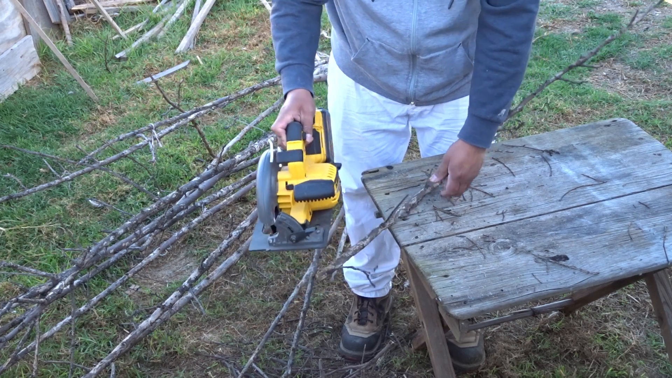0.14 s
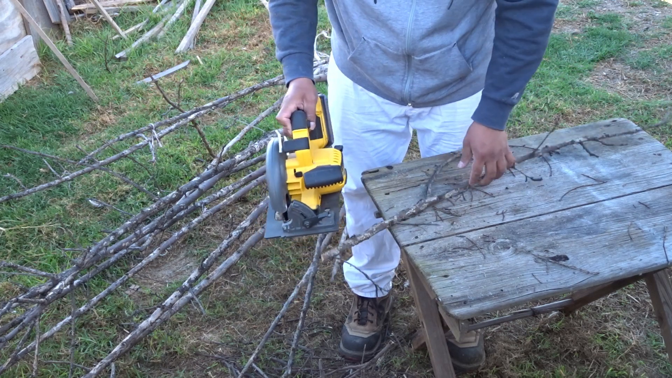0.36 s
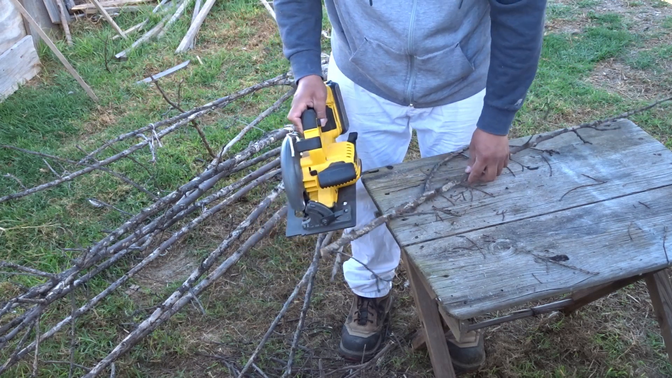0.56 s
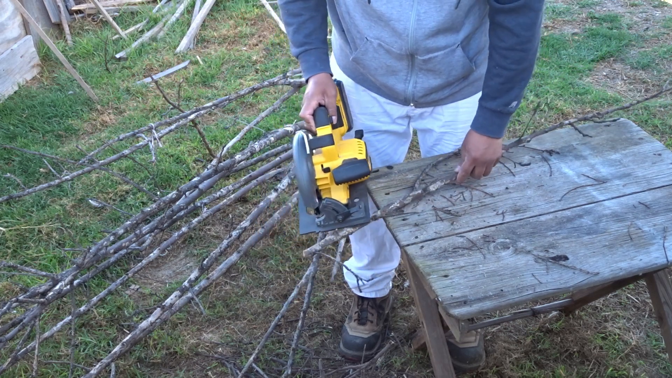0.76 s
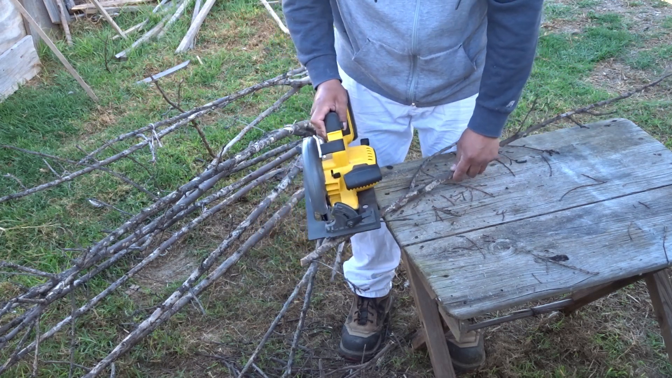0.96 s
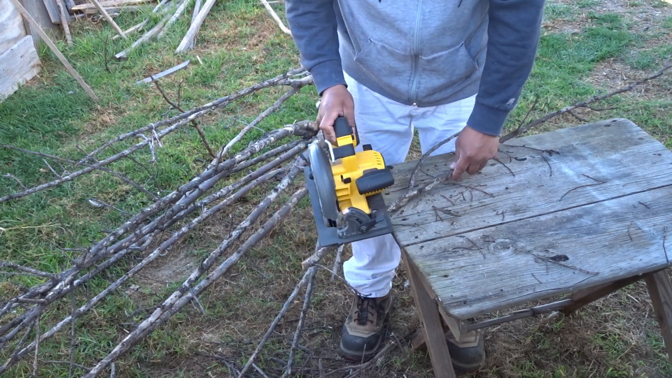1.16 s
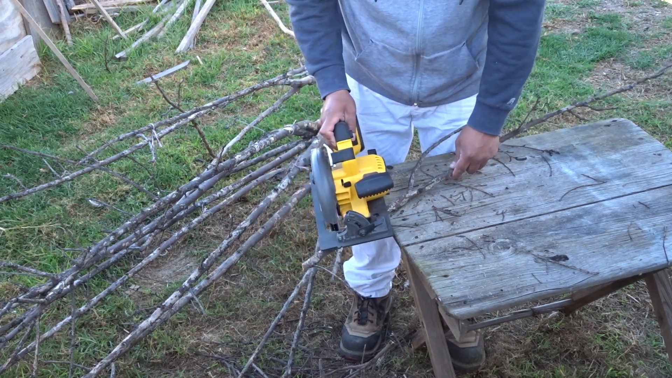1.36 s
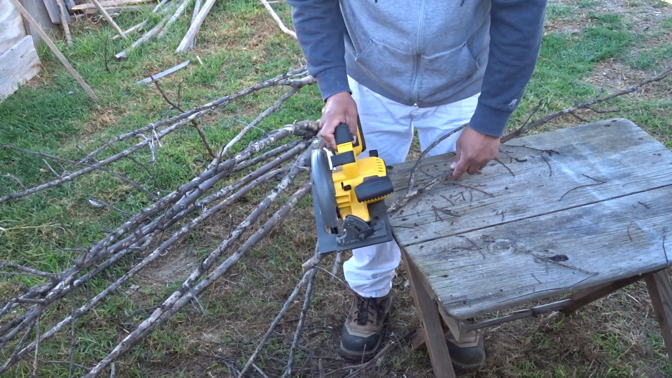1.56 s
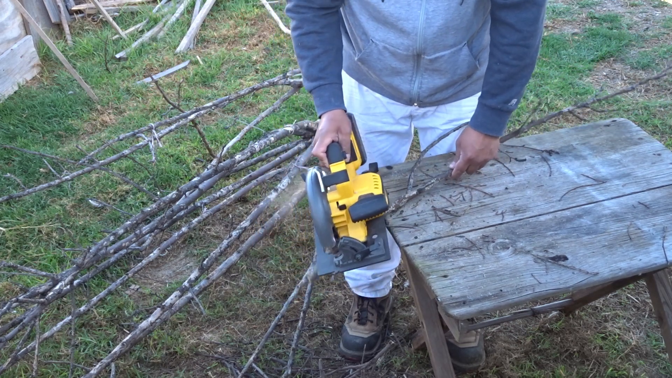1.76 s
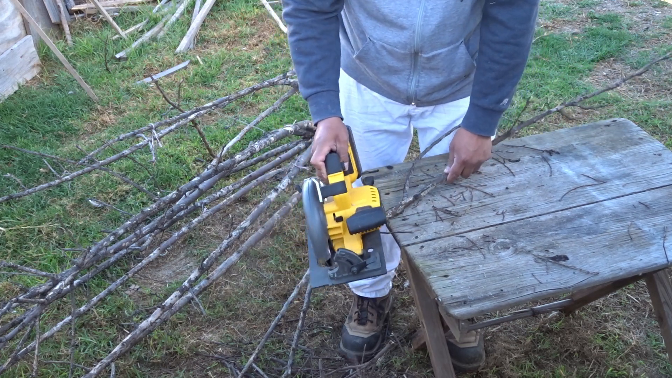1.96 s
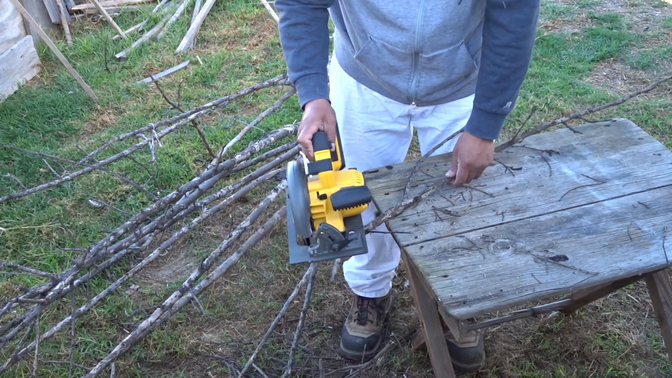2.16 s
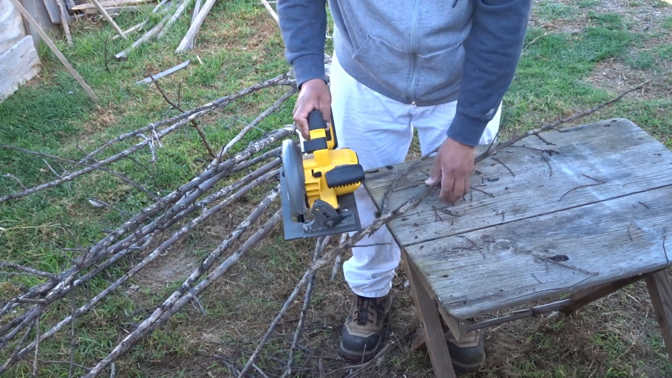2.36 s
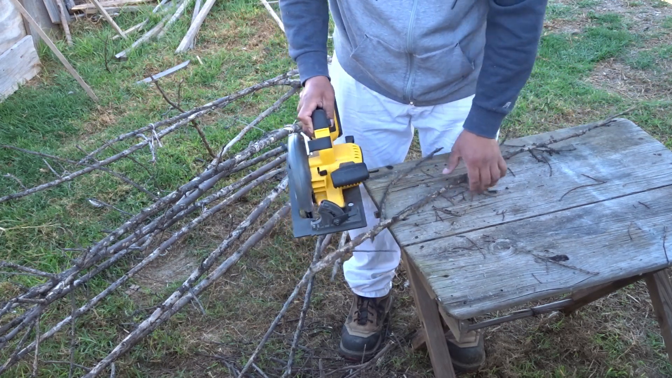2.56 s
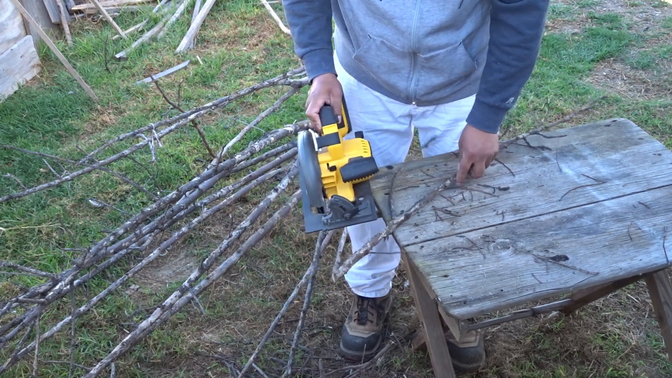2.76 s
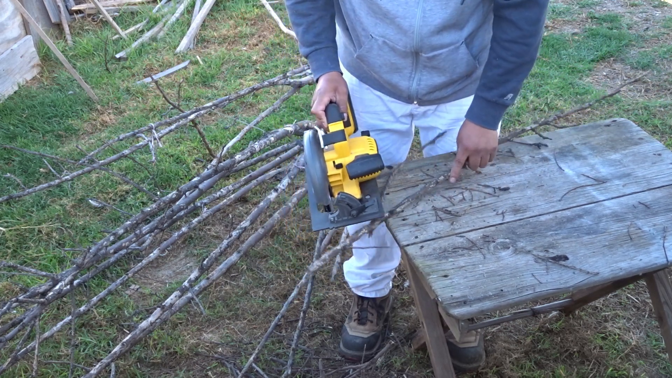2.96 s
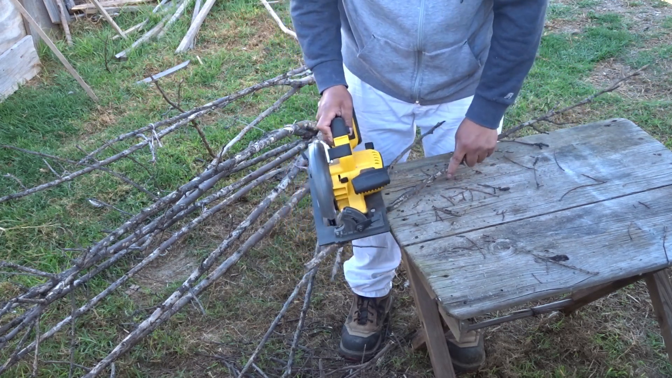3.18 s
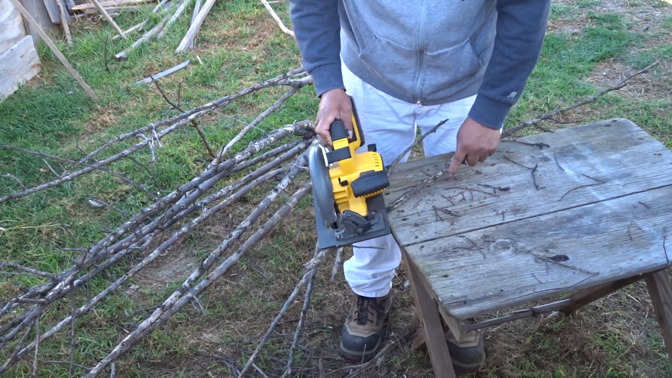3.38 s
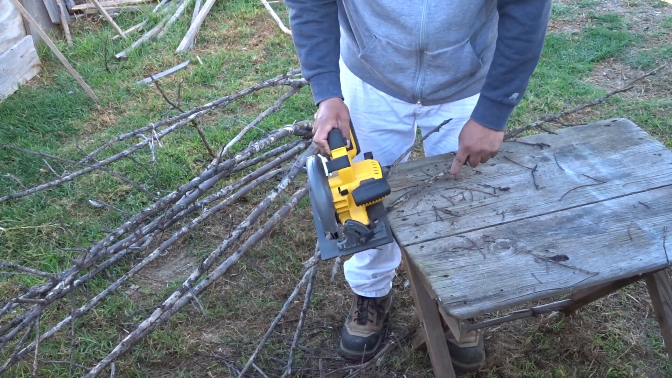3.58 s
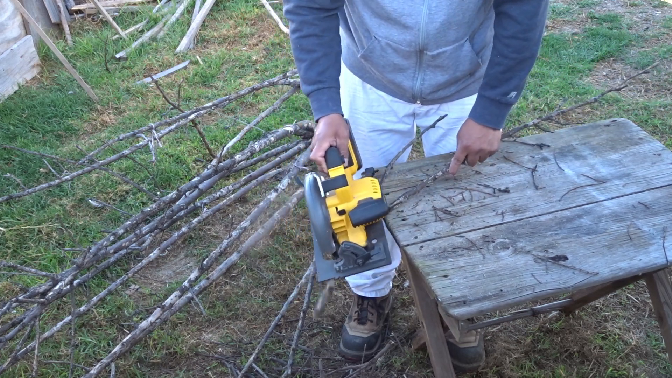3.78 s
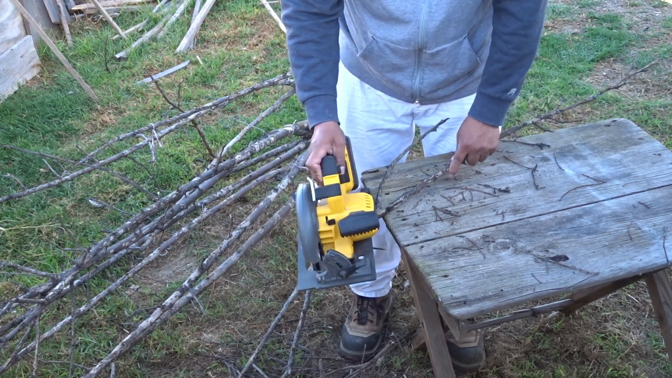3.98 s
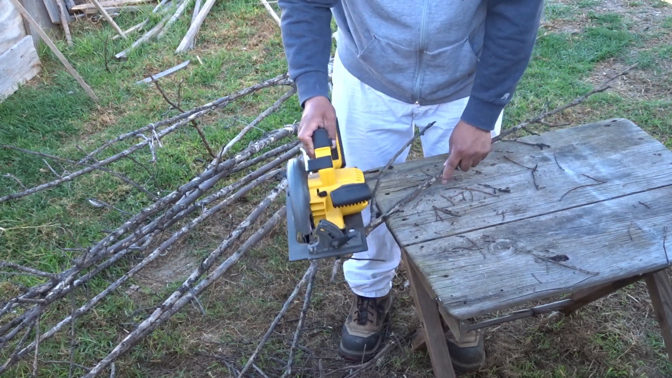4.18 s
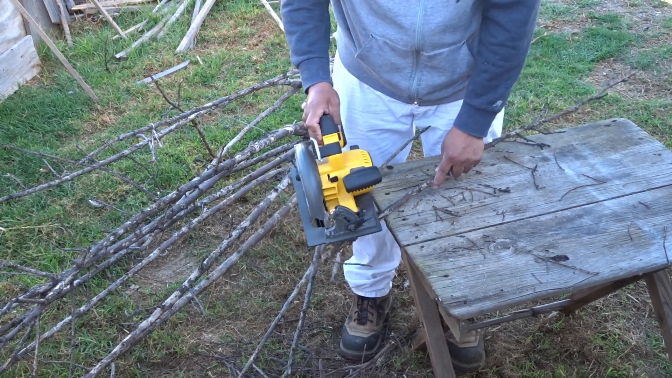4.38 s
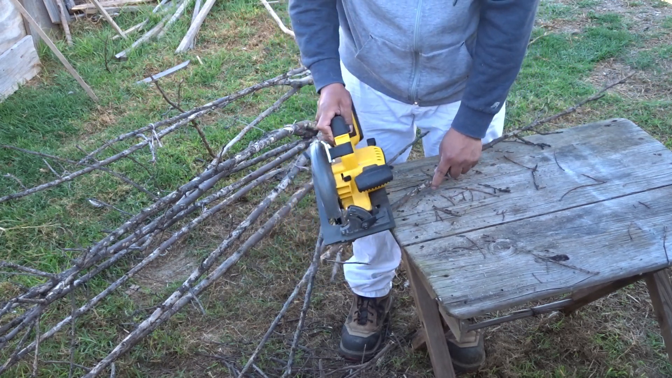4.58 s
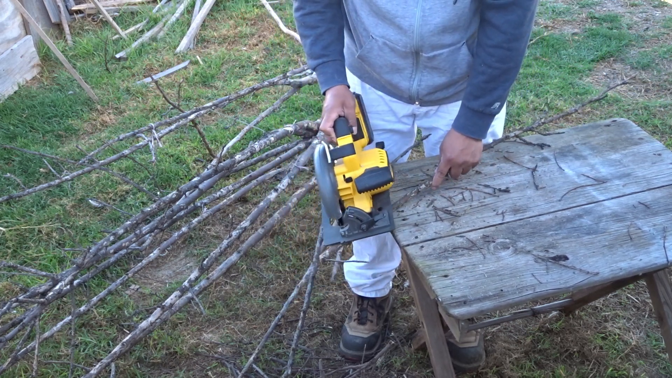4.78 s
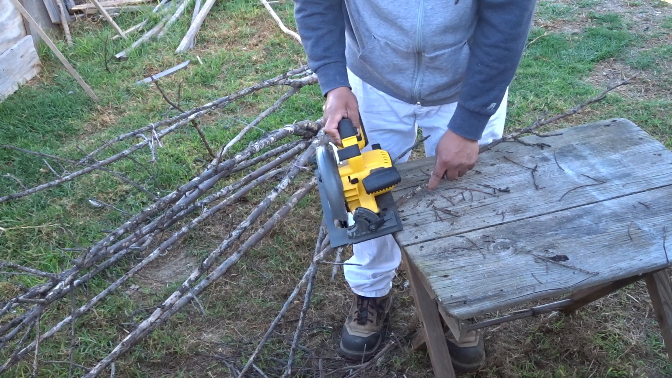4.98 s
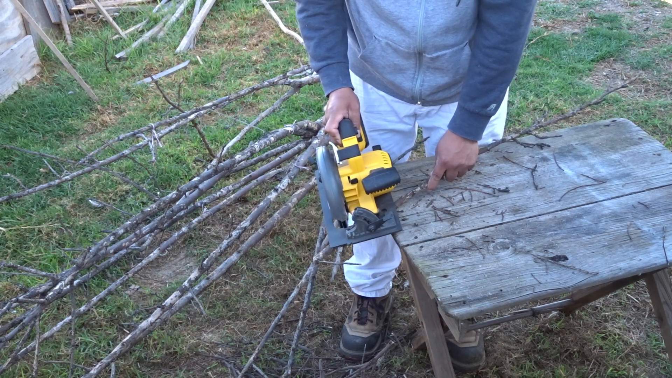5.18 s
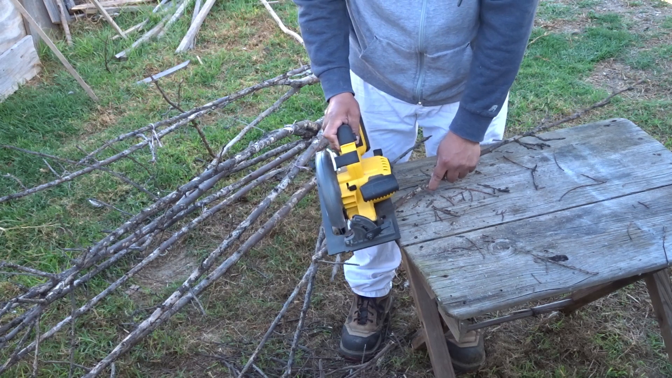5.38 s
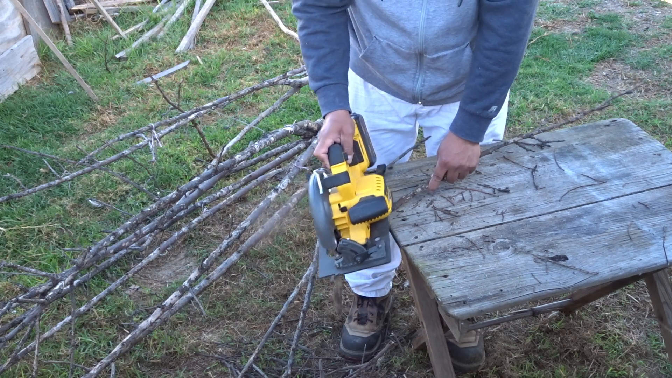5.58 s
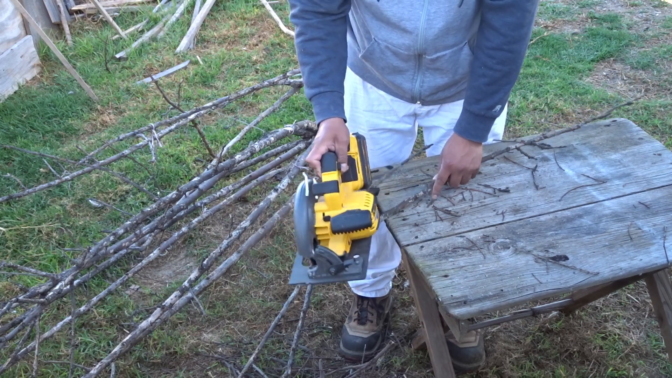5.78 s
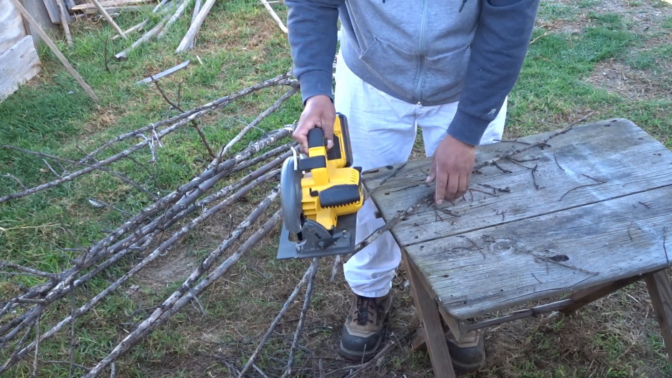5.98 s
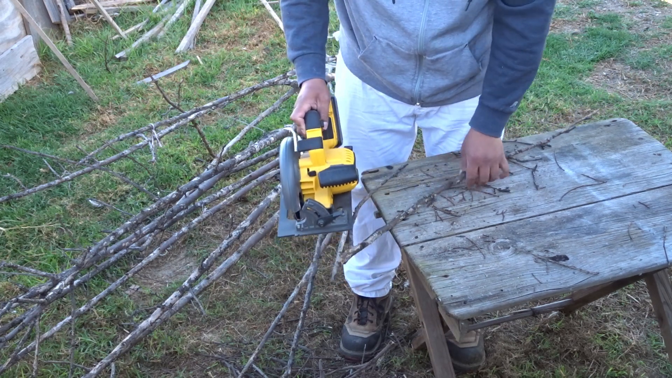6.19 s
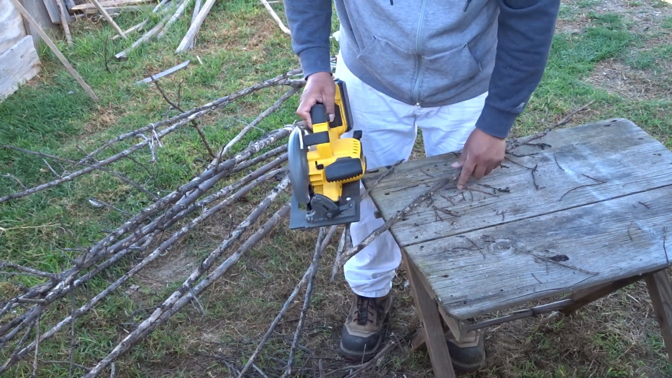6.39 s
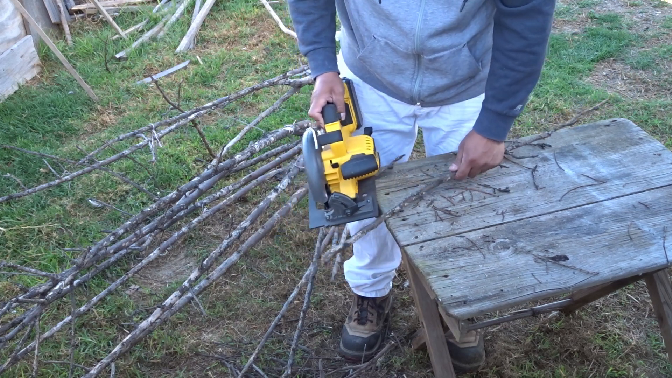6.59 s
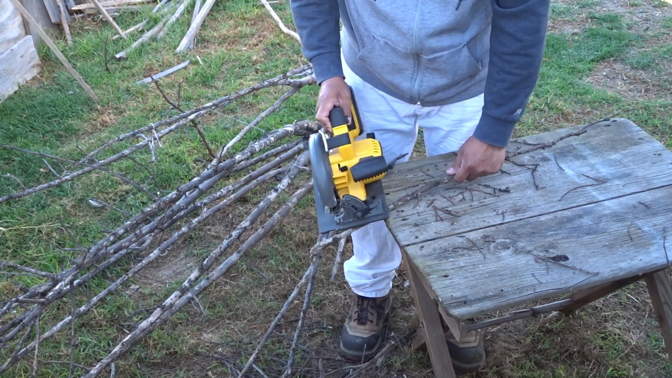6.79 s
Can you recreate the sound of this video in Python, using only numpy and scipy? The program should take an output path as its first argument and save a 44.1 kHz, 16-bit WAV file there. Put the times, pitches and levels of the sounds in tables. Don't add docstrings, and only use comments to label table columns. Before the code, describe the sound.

Four short bursts of a battery circular saw, three biting dry sticks, each stopping fast with a metallic ring, amid crackling twigs and faint birds.

```python
import sys
import numpy as np
from scipy import signal
from scipy.fft import rfft, irfft, next_fast_len
from scipy.io import wavfile
from scipy.ndimage import uniform_filter1d

SR = 44100
rng = np.random.default_rng(int(sys.argv[2]) if len(sys.argv) > 2 else 0)


def put_to_file(sound):
    columns = np.atleast_2d(sound).T
    safe = np.clip(columns, -1, 1)
    whole_steps = np.round(safe * 32767)
    wavfile.write(sys.argv[1], SR, whole_steps.astype(np.int16))


def invert_db(level):
    return 10 ** (np.asarray(level, dtype=float) / 20)


N = 301644
T = np.arange(N) / SR

# (by the brake law, 1 s before halt)
PULLS = [
    (-1, 1100, 445, .452, 562),
    (1.4358, 1045, 440, 2.513, 585),
    (3.367, 1115, 445, 4.543, 590),
    (5.146, 1100, 450, 6.33, 595),
]
FACING_DB = [
    -1.4,
    0.12,
    0.091,
    .1,
]
# multiple_of_shaft, level_db, extra_braking_db, roughness_0_to_1, best_hz, spread_octaves
WHINE_ORDERS = [(1.016, -43.5, 9, 0.25, 424, 0.27), (3.946, -21.5, 8, 0.12, 1940, 0.81),
                (4.96, -33.5, -2, 0.8, 1860, 0.95), (7.967, -7, -2, 0.17, 2110, 0.42),
                (9.01, -13.5, 0, 0.42, 2050, 0.59), (12.02, -29, 9.5, 0.97, 3000, 0.78),
                (13.08, -12.5, 0.8, 0.14, 4130, 0.72), (16.04, -17.5, 3.5, 0.31, 3100, 0.68),
                (17.76, -18, -5.5, 0.9, 2670, 0.57), (19.6, -26, -1, 0.1, 1700, 0.29),
                (25.96, -24.5, 0, 1, 4700, 0.74), (27.5, -29.5, 7, 0.5, 5900, 0.44)]
# shaft_hz, rattle_db, whine_over_rattle_db, climbing_air_over_rattle_db, braking_air_db
LOUDNESS_BY_SPEED = [(45.3, -28, 4, -41, -23.5), (90, -23.5, 1, -38, -18.5), (140, -21, -1, -25.5, -20),
                     (190, -22.5, -2.5, -10.5, -14), (287, -20, -2, -14, -18), (340, -19, -3, -7.5, -10.5),
                     (401, -16.5, -1, -6.5, -11.5), (432, -16, -2.5, -10, -10)]
# freq_hz, level_db
RATTLE_COLOUR = [(15, -62), (25, -52), (273, -65), (385, -56.5), (457, -40), (571, -20.5), (730, -24),
                 (826, -15), (1350, -13.5), (1530, -5.5), (1910, -6.5), (2320, -1), (2760, -5), (4090, -1),
                 (9000, -20.5), (11700, -28), (19800, -120)]
# pitch_hz, t60_s, level_db
GUARD_MODES = [(2214, 0.098, -22), (4038, 0.062, -16), (7356, 0.09, -19.5), (8120, 0.053, -28.5)]
# pitch_hz, width_hz, lift_db
HOUSING_BOOMS = [(2288, 405, 7.5), (4106, 600, 3.5), (7040, 1200, 2)]
# freq_hz, level_db
FAN_COLOUR = [(3530, -36), (6000, 2.5), (8510, 1), (9280, -5.5), (10800, -9), (12800, -23.5),
              (15600, -18.5), (16800, -43)]
MESH_HZ = 50
SETTLE_S, BRAKE_POWER = .12, .68
BRAKE_RATTLE_DB, CUT_WHINE_DB = -0.43, -7
STALL_HZ, STALL_DB = 136, -10

# freq_hz, level_db
YARD_COLOUR = [(25, -29.5), (120, -17.5), (300, -30), (600, -2), (1000, -8), (2000, 2), (4000, 3.5),
               (6000, -9.5), (10000, -33), (16500, -36)]
YARD_DB = -61.5
# middle_s, half_length_s, level_db
ENGINE_SWELLS = [
    (.6, 0.18, -85),
    (2.7, .3, -72.5),
    (6.8, .5, -90),
]

# start_s, fade_60db_s, crackles_per_s, level_db
DRAGS = [(.4, .5, 140, -43.5), (.7, 4.5, 350, -62), (1.24, 2, 270, -56), (2.45, 1.4, 130, -49),
         (2.7, 0.27, 1630, -45.5), (2.97, 1.6, 360, -53.5), (4.5, 0.55, 130, -47.5),
         (4.6, 0.28, 860, -50.5), (6.3, 1, 180, -56.5), (6.62, 1, 480, -53.5), (6.76, 1.5, 440, -62)]
DRAG_RISE_S = .3
TWIGS_DB, TWIGS_PER_S = -76.5, 230

# middle_s, half_length_s, level_db
BIRD_BOUTS = [
    (.9, .15, -57.5),
    (1.4, 0.22, -52.5),
    (2.7, 0.13, -55),
    (3.15, 0.13, -52),
    (4.78, 0.092, -51),
    (6.45, .35, -55),
]
BIRDS_REST_DB = -68
# time_s, pitch_hz, level_db
NEAR_CALL = [
    (1.41, 4900, -61),
    (1.425, 5800, -50),
    (1.45, 6300, -54),
    (1.475, 5900, -46),
    (1.49, 4900, -66),
]

# start_s, crack_peak_db, knock_over_crack_db, left_minus_right_db
SNAPS_AND_CATCHES = [(0.412, -34, 3, 6), (0.4313, -32.5, -10, -15), (0.447, -32, -3, 0.0), (0.7351, -56, 8, 6),
                     (0.822, -57, 9, 0.5), (1.2395, -57, 22.5, -6), (1.49, -43, 15, -0.5), (1.508, -50, 14, 9),
                     (1.5333, -58, 36, 8), (2.602, -18.5, -9.5, -4), (2.6817, -28, -20, 2),
                     (2.7566, -33, -12, -2.0), (2.8907, -15, -24, -6), (2.965, -36, -5, -9), (2.9744, -39, -1, 3),
                     (2.9889, -36, -5, -8), (3.2523, -49.5, 11, 0), (3.414, -47, 18, -2), (3.4467, -41, 8.5, 6),
                     (4.562, -11, -8, -3.0), (4.5674, -15, -7, -7.5), (5.004, -38, -18.5, -6),
                     (5.194, -49, 19, 0.0), (5.229, -27, 3, -8), (6.554, -30, -2, -3), (6.6058, -43.5, 16, 2),
                     (6.624, -31, -1.5, -3.5), (6.6928, -49, 12.5, 0), (6.7577, -35, 1, -3)]

# pitch_hz, t60_s, then level_db after each of the four stops
STOPPED_BLADE = [(982, 0.31, -29, -41, -24, -2.5), (1174, 3.8, -10, -13.5, -28, -19),
                 (1324, 1.6, -12, -19, -38, -32), (1401, 4, -16, -17.5, -12.5, -25),
                 (1475, 10.4, -7, -21, -12.5, -15.5), (1735, 1.58, -5.5, -6.5, -5, -27),
                 (1980, 0.25, -27, 3, -17.5, -2.5), (2095, 8.2, -14.5, -3.5, -2.5, -11.5),
                 (2464, 0.93, -8, -15, -20, -8), (2600, .5, -11, -34.5, -20, -20),
                 (3031, 0.88, -4, -27, -31, -37), (3070, 4.1, 1, -13, -2, -14),
                 (3340, 5, -24, -17, -22, -13), (3760, 3.36, -5, -2.5, -5.5, -12.5),
                 (3930, 1.2, -2.5, -13, -4, -12), (4980, 1.9, -14, -21, -7, -14.5),
                 (6500, 0.75, -18, -20, -42, -22.5), (7430, 0.4, -30.5, -32, -34, -36)]
# pitch_hz, beat_hz, then partner_share (ratio) after each of the four stops
SPLIT_MODES = [(3785, 7.3, 0.36, 0.96, 0.42, 0.66), (3274, 4.32, 0.19, 0.34, 0.11, 0.51),
               (5400, 11, .2, .3, 0.3, .9)]
# start_s, damped_s, level_db
RING_OUTS = [
    (.42, 1.44, -48),
    (2.44, 3.45, -39),
    (4.48, 5.22, -47.5),
    (6.29, 6.9, -40),
]

# time_s, slip_rate_hz, level_db
SQUEAK_GLIDE = [
    (1.265, 2122, -42),
    (1.269, 2187, -21.5),
    (1.279, 2156, -19),
    (1.284, 2220, -26),
    (1.29, 2180, -42),
    (1.3, 2200, -53),
    (1.335, 2140, -68.5),
]

# start_s, peak_db
CLICKS = [
    (1.4506, -26),
    (3.3668, -25),
    (5.1458, -28),
]
# pitch_hz, t60_s, level_db
SWITCH_MODES = [(1490, 0.046, -8.5), (1880, 0.035, -5), (2670, 0.016, -2.5), (3770, 0.01, 7.5),
                (4900, 0.019, 3), (6930, .015, -6), (10000, .012, -33.5)]

# start_s, end_s, rasp_db, tooth_tone_db, blade_shake_db
WOOD_CUTS = [
    (1.74, 1.85, -27, -30.5, -28.5),
    (3.655, 3.76, -30.5, -30, -16.5),
    (5.455, 5.555, -29, -36.5, -29.5),
]
TOOTH_PARTIALS_DB = [-13, -7, 8.5, -13, -35.5, -10]
# freq_hz, level_db
RASP_COLOUR = [(600, -69), (1500, -13.5), (2500, 15.5), (4500, -17), (6500, -6), (8500, 9), (10500, 5),
               (14000, -3), (17000, -21)]
# pitch_hz, t60_s, then level_db in each of the three cuts
SPINNING_BLADE = [(1356, 1.74, 2, -10, 11.5), (2562, 1.2, 5, -2.5, 0), (2810, .6, -14, -20, -11),
                  (3050, .6, -15.5, -22, -18), (3988, .5, -9, -18, -1), (6230, .4, 2, -6, -17.5),
                  (8200, .3, -9, -6, -18)]
TOOTH_START_HZ, TOOTH_END_HZ = 564, 622

# freq_hz, side_minus_mid_db
SIDE_COLOUR = [(60, -8), (110, -6), (200, -13), (380, -30.5), (700, -20.5), (1290, -14), (2380, -13),
               (4400, -7), (8120, -5.5), (15000, -5)]


def curve(rows):
    s, *columns = np.transpose(rows)
    return [np.interp(T, s, column) for column in columns]


def unit(x):
    return x / np.sqrt(np.mean(x ** 2))


def colour(x, points):
    size = next_fast_len(len(x))
    hz, db = np.transpose(points)
    log_f = np.log(np.maximum(np.arange(size // 2 + 1) * SR / size, 1))
    gain = invert_db(np.interp(log_f, np.log(hz), db))
    return irfft(rfft(x, size) * gain, size)[:len(x)]


def walk(rate):
    k = max(int(SR / rate), 1)
    held = rng.standard_normal(N // 16)[np.arange(N) // max(k, 17)]
    return unit(uniform_filter1d(uniform_filter1d(held, k), k))


def ring(x, hz, t60):
    pole = np.exp(2j * np.pi * hz / SR - np.log(1000) / (t60 * SR))
    return signal.lfilter([1], [1, -pole], x).imag


def swells(rows):
    return sum(invert_db(db) * np.exp(-.5 * ((T - s) / half_s) ** 2) for s, half_s, db in rows)


def opposite(x):
    return x * np.array([[1], [-1]])


def spin(start_s, gain, free, halt_s, brake):
    age = np.maximum(T - start_s, 0)
    short = gain * SETTLE_S
    knee_s = (free - short) / gain
    settling = free - short * np.exp((knee_s - age) / SETTLE_S)
    climb = np.where(age < knee_s, gain * age, settling)
    return np.minimum(climb, brake * np.maximum(halt_s - T, 0) ** BRAKE_POWER)


def gear_rattle(jolt, shaft_hz):
    knocks = jolt * invert_db(1.6 * walk(900)) * rng.standard_normal(N)
    rattle = unit(colour(knocks, RATTLE_COLOUR))
    rattle += sum(invert_db(db) * unit(ring(knocks, hz, t60)) for hz, t60, db in GUARD_MODES)
    bright = colour(rattle, [(1500, -25), (3500, -0.5), (6000, 1.5)])
    return rattle - bright * np.clip(1 - shaft_hz / 280, 0, .8)


def gear_whine(shaft_hz, turns, turning, braking):
    whine = np.zeros(N)
    for order, db, brake_db, rough, best_hz, octaves in WHINE_ORDERS:
        hz = np.maximum(order * shaft_hz[turning], 30)
        lift = 1 + sum(invert_db(g) / (1 + ((hz - f) / (w / 2)) ** 2) for f, w, g in HOUSING_BOOMS)
        radiated = np.exp(-.5 * (np.log2(hz / best_hz) / octaves) ** 2)
        level = invert_db(2.0 * walk(15)[turning]) * (1 + rough * walk(150)[turning])
        phase = 2 * np.pi * order * turns + 2.35 * rough * walk(120)
        tone = level * np.sin(phase[turning])
        whine[turning] += invert_db(db + brake_db * braking[turning]) * lift * radiated * tone
    return whine


def motor(shaft_hz, turns):
    speed, *levels = np.transpose(LOUDNESS_BY_SPEED)
    rattle_db, whine_db, air_db, coast_db = (np.interp(shaft_hz, speed, c) for c in levels)
    on = uniform_filter1d(1. * (shaft_hz > MESH_HZ), size=200)
    braking = uniform_filter1d(1. * (np.gradient(shaft_hz) < 0), size=800)
    loaded = uniform_filter1d(sum(1. * (T > c[0]) * (T < c[1]) for c in WOOD_CUTS), size=800)
    facing_db = sum(db * (T >= b[0]) * (T < b[3]) for b, db in zip(PULLS, FACING_DB))
    jolt = 1 + 0.15 * np.cos(2 * np.pi * turns) + 0.1 * np.cos(2 * np.pi * turns / 4.8)
    rattle = gear_rattle(jolt, shaft_hz)
    air = unit(colour(jolt * invert_db(1.3 * walk(40)) * rng.standard_normal(N), FAN_COLOUR))
    whine = gear_whine(shaft_hz, turns, on > 0, braking)
    mix = invert_db(-4.0 + BRAKE_RATTLE_DB * braking) * rattle
    mix += invert_db(air_db + (coast_db - air_db) * braking - 4.0) * air
    mix += invert_db(whine_db + 4.5 + CUT_WHINE_DB * loaded) * whine
    stall_db = STALL_DB * braking * np.clip(1 - shaft_hz / STALL_HZ, 0, 1)
    return on * invert_db(rattle_db + facing_db + stall_db) * mix


def yard():
    mid, side = (unit(colour(rng.standard_normal(N), YARD_COLOUR)) for _ in range(2))
    drone = swells(ENGINE_SWELLS) * invert_db(2.5 * walk(12)) * np.sin(2 * np.pi * 121 * T + .8 * walk(5.05))
    return invert_db(YARD_DB + 3.9 * walk(2.23)) * (mid + 0.69 * opposite(side)) + drone


def rustle():
    drags = []
    for s, fade_s, _, db in DRAGS:
        fall = np.where(T < s, (s - T) / DRAG_RISE_S, (T - s) / fade_s)
        drags.append(invert_db(db - 60 * fall))
    gain = invert_db(TWIGS_DB) + sum(drags)
    busy = invert_db(TWIGS_DB) * TWIGS_PER_S + sum(d * row[2] for d, row in zip(drags, DRAGS))
    chance = busy / gain / SR
    sizes = invert_db(2.5 * np.minimum(rng.exponential(size=(2, N)), 3.5))
    clicks = (rng.random((2, N)) < chance) * sizes / np.sqrt(chance)
    smear = rng.standard_normal(400) * invert_db(-60 * np.arange(400) / SR / 0.018)
    bark = [(300, -14), (700, 6.5), (2200, -1), (5000, 3.0), (7500, -13.0), (11000, -18.0), (16500, -40)]
    mid, side = (unit(colour(signal.fftconvolve(c, smear)[:N], bark)) for c in clicks)
    return gain * (mid + 0.64 * opposite(side))


def birds():
    chirps, age = np.zeros(N + 1200), np.linspace(0, 1, 1200)
    for s, pitch, slide, size in rng.random((1500, 4)):
        hz = (2900 + 1500 * pitch ** 1.5) * (1 + 0.466 * (slide - .5) * age)
        i = int(s * N)
        note = np.sin(np.pi * age) ** 2 * np.sin(2 * np.pi * np.cumsum(hz) / SR)
        chirps[i:i + 1200] += invert_db(7.3 * size) * note
    flock = chirps[:N] * walk(700)
    blur = rng.standard_normal((2, 6000)) * invert_db(-60 * np.arange(6000) / SR / 0.08)
    blur = blur[0] + .5 * blur
    far = unit(signal.fftconvolve(flock[None], blur, axes=1)[:, :N])
    far *= invert_db(BIRDS_REST_DB) + swells(BIRD_BOUTS)
    hz, db = curve(NEAR_CALL)
    call = np.sin(2 * np.pi * np.cumsum(hz) / SR + 1.3 * walk(340))
    return far + invert_db(db) * call * (T > NEAR_CALL[0][0]) * (T < NEAR_CALL[-1][0])


def snaps():
    out, age = np.zeros((2, N + 4000)), np.arange(4000) / SR
    crack_colour = [(1500, -42), (3800, 16.5), (7500, 8.5), (11000, 0.5), (16000, -41)]
    knock_colour = [(300, -23), (1200, 11.0), (2200, 16), (3500, 9), (6000, -48.0)]
    crack_fade = invert_db(-60 * age / 0.012) + invert_db(-25 - 60 * age / 0.12)
    no_bass = signal.butter(2, 500, "high", fs=SR, output="sos")
    noises = rng.standard_normal((len(SNAPS_AND_CATCHES), 2, 4000))
    for (s, db, knock_db, pan_db), noise in zip(SNAPS_AND_CATCHES, noises):
        crack = colour(noise[0], crack_colour) * crack_fade
        knock = colour(noise[1], knock_colour) * invert_db(-60 * age / 0.081)
        snap = crack / abs(crack).max() + invert_db(knock_db - 1.5) * knock / abs(knock).max()
        i = int(s * SR)
        pan = np.array([[pan_db], [-pan_db]]) / 2
        out[:, i:i + 4000] += invert_db(db + pan) * signal.sosfilt(no_bass, snap)
    return out[:, :N]


def blade():
    out = np.zeros(N)
    for j, (t0, t1, db) in enumerate(RING_OUTS):
        part = slice(int(t0 * SR), int((t1 + .06) * SR))
        age = T[part] - t0
        song = np.zeros(len(age))
        for hz, t60, *db_after in STOPPED_BLADE:
            twin = sum(p[2 + j] * np.exp(2j * np.pi * p[1] * (age - .022))
                       for p in SPLIT_MODES if abs(p[0] - hz) < 40)
            mode = ((1 + twin) * np.exp(2j * np.pi * hz * age)).imag
            song += invert_db(db_after[j] - 60 * age / t60) * mode
        rise = np.clip(age / 0.023, 0, 1)
        touch = np.clip((t1 - T[part]) / .05 + 1, 0, 1)
        out[part] += np.sqrt(2) * invert_db(db) * song * rise * touch
    return out


def squeak():
    hz, db = curve(SQUEAK_GLIDE)
    phase = 2 * np.pi * np.cumsum(hz) / SR + .4 * walk(400)
    grit_colour = [(500, -20), (1200, 3.5), (5500, 6), (9000, -6.5), (16000, -32)]
    grit = unit(colour(rng.standard_normal(N), grit_colour))
    tone = np.sin(phase) + invert_db(-3.5) * np.sin(2 * phase) + invert_db(-8) * grit
    return invert_db(db) * tone * (T > SQUEAK_GLIDE[0][0]) * (T < SQUEAK_GLIDE[-1][0])


def trigger():
    taps = np.zeros(N)
    for s, db in CLICKS:
        for lag_s, bounce_db in (0, 0.5), (.0015, 5), (.004, -10.5), (.007, -11.5):
            taps[int((s + lag_s) * SR)] = invert_db(db + bounce_db)
    click = sum(invert_db(db) * ring(taps, hz, t60) for hz, t60, db in SWITCH_MODES)
    return invert_db(-10) * colour(click, [(300, -38), (1100, 0.5), (9000, -5.5), (15000, -39)])


def cutting(shaft_hz):
    rate_rows = []
    for c in WOOD_CUTS:
        rate_rows += [(c[0], TOOTH_START_HZ), (c[1], TOOTH_END_HZ)]
    teeth = np.cumsum(curve(rate_rows)[0]) / SR
    tone = np.zeros(N)
    for k, db in enumerate(TOOTH_PARTIALS_DB, 1):
        tone += invert_db(db) * (1 + 0.16 * walk(90)) * np.sin(2 * np.pi * k * teeth)
    tearing = (1 + 0.56 * np.cos(2 * np.pi * teeth)) * invert_db(1.6 * walk(200)) * rng.standard_normal(N)
    rasp = unit(colour(tearing, RASP_COLOUR))
    out = np.zeros(N)
    for j, (t0, t1, rasp_db, tone_db, shake_db) in enumerate(WOOD_CUTS):
        bite = np.interp(T, [t0, t0 + 0.0027, t1 - .02, t1], [0, 1, 0.96, 0.001])
        out += bite * (invert_db(rasp_db) * rasp + invert_db(tone_db) * tone)
        part = slice(int(t0 * SR), int((t0 + 0.61) * SR))
        shove = (bite * rng.standard_normal(N))[part]
        song = sum(invert_db(row[2 + j]) * ring(shove, row[0], row[1]) for row in SPINNING_BLADE)
        out[part] += invert_db(shake_db - 41.5) * song * np.clip(shaft_hz[part] / 150 - 1.2, 0, 1)
    return out


def scene():
    shaft_hz = sum(spin(*pull) for pull in PULLS)
    turns = np.cumsum(shaft_hz) / SR
    saw = motor(shaft_hz, turns) + cutting(shaft_hz) + blade() + trigger() + squeak()
    t60_s = np.array([[.14], [.2]])
    scatter = rng.standard_normal((2, 9000)) * invert_db(-60 * np.arange(9000) / SR / t60_s)
    near, far = (signal.fftconvolve(saw, r / np.sqrt(np.sum(r ** 2)))[:N] for r in scatter)
    side = colour(near, SIDE_COLOUR) - 0.044 * saw
    return saw + invert_db(-10.5) * far + opposite(side) + snaps() + rustle() + birds() + yard()


def band_limit(x):
    return signal.sosfilt(signal.butter(12, 16970, fs=SR, output="sos"), x)


def record(dry):
    soft = np.tanh(1.93 * dry) / 1.847
    bass = signal.sosfilt(signal.butter(1, 330, fs=SR, output="sos"), soft)
    return band_limit(soft - 0.59 * bass)


dry = scene()
out = record(dry)
put_to_file(out)
```